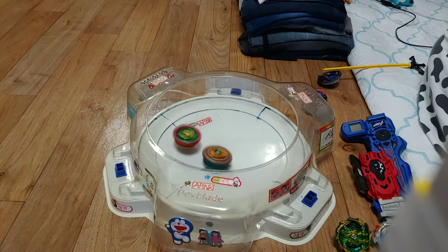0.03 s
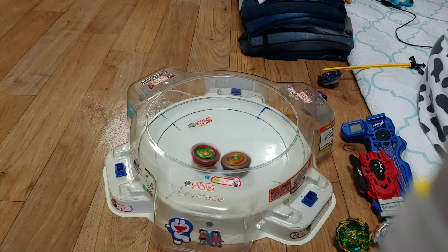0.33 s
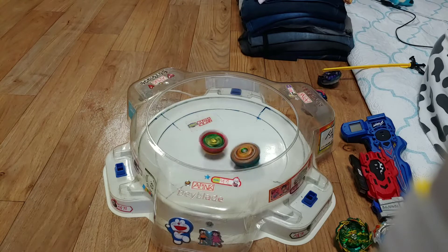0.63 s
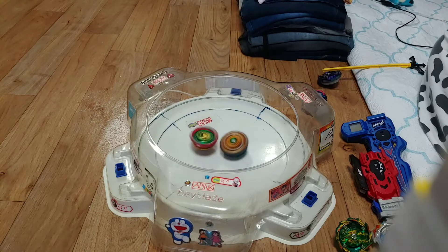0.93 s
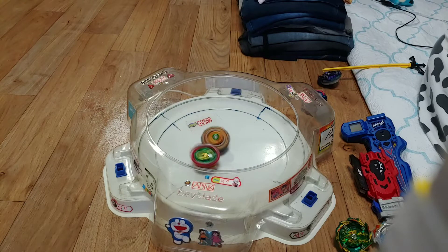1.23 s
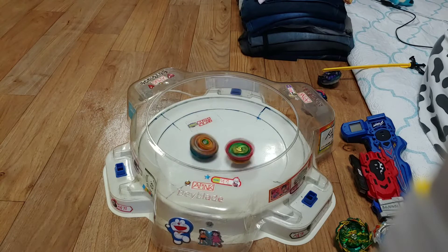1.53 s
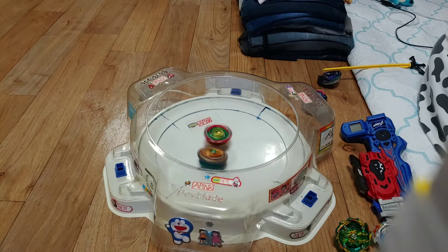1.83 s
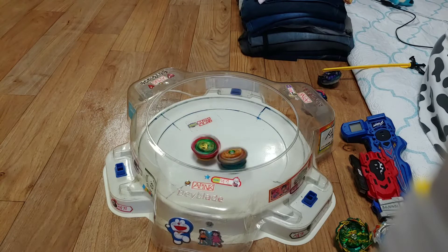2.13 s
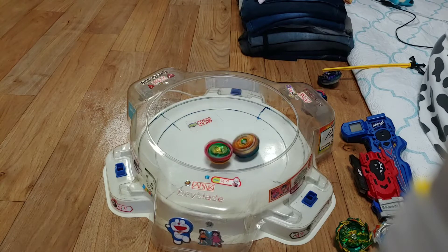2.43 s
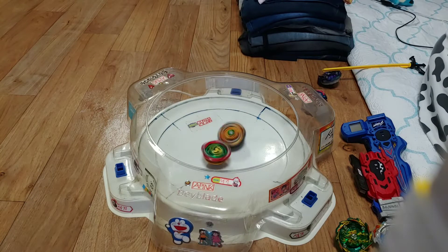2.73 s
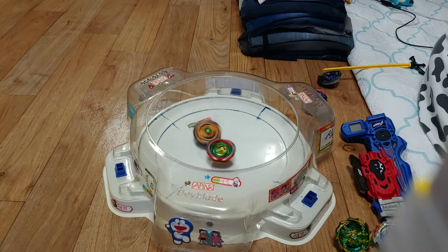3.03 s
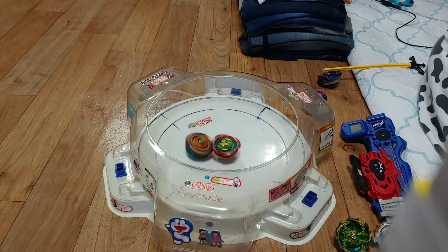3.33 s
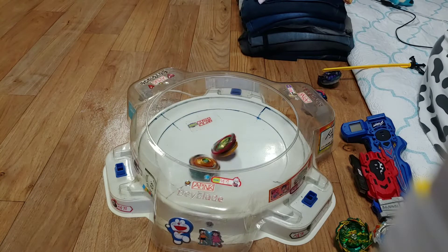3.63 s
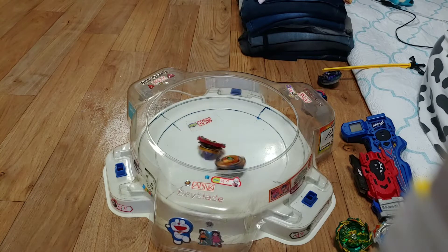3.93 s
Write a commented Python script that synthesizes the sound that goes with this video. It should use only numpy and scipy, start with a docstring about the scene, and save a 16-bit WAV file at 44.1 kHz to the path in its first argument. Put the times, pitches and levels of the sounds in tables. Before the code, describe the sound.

Toy tops spin and grind around a hollow plastic dish, clashing again and again.

```python
"""Spinning tops in a plastic arena

Two tops circle and slow down in a covered dish on a wooden floor. Friction at their tips
drives the resonances of the thin dish, which booms as they lurch and rattles its cover.
The rims clash and chatter, the metal discs whir, and a small room reverberates."""
import sys
import numpy as np
from scipy import signal
from scipy.fft import rfft, irfft
from scipy.io import wavfile

SR = 44100
rng = np.random.default_rng(int(sys.argv[2]) if len(sys.argv) > 2 else 0)


def bounce(signal):
    """Save signal as a 16-bit WAV file at the path given by the first command-line argument."""
    frames = np.transpose(np.atleast_2d(signal))
    limited = np.clip(frames, -1, 1)
    pcm = np.round(limited * 32767).astype(np.int16)
    wavfile.write(sys.argv[1], SR, pcm)


N = 176400


def undb(db):
    """Amplitude ratio of a level in decibels."""
    return 10 ** (np.asarray(db) / 20)


def unit(x):
    """Normalisation to unit rms."""
    return x / np.sqrt(np.mean(x ** 2))


def envelope(t, levels):
    """Amplitude envelope, linear in decibels between (time, level) points."""
    return undb(np.interp(t, *np.array(levels).T))


def gate(t, start, length, edge_s):
    """Trapezoidal window: on for a length of time, with short ramps."""
    return np.clip(np.minimum(t - start, start + length + edge_s - t) / edge_s + .5, 0, 1)


def minimum_phase(gain):
    """Folding the cepstrum gives the earliest causal response with these gains."""
    cepstrum = irfft(np.log(gain))
    cepstrum[1:len(cepstrum) // 2] *= 2
    cepstrum[len(cepstrum) // 2 + 1:] = 0
    return np.exp(rfft(cepstrum))


def response(colour, modes=(), size=8192):
    """Impulse response of unit energy: resonances on a broad spectral envelope."""
    f = np.arange(size // 2 + 1) * SR / size + 1
    hz, db = np.array(colour).T
    gain = undb(np.interp(np.log(f), np.log(hz), db))
    for centre, width, lift in modes:
        peak = 1 / (1 + (2 * (f - centre) / width) ** 2) ** 2
        gain *= np.sqrt(1 + (undb(lift) ** 2 - 1) * peak)
    h = irfft(minimum_phase(gain))
    return h / np.linalg.norm(h)


def through(x, h):
    """Convolution with an impulse response."""
    return signal.fftconvolve(x, h)[:len(x)]


def reverberate(x, t60_s, tail_db, above_hz):
    """Diffuse reflections add an exponentially decaying tail at about the same total power."""
    t = np.arange(16384) / SR
    tail = rng.standard_normal(len(t)) * np.exp(-np.log(1000) * t / t60_s)
    tail = signal.sosfilt(signal.butter(2, above_hz, "high", fs=SR, output="sos"), tail)
    h = tail * undb(tail_db) / np.linalg.norm(tail)
    h[0] += 1  # direct sound
    spectrum = rfft(h, 2 * len(h))
    h = irfft(spectrum * minimum_phase(abs(spectrum) ** -.45))  # partly evens out the spectrum
    return through(x, h / np.linalg.norm(h))


def under_cover(x):
    """Cavity reverberation: short, dense reflections between dish and cover."""
    return reverberate(x, t60_s=.13, tail_db=3, above_hz=800)


SPIN_HZ, SPIN_LOSS_HZ_PER_S = (72.7, 51.5), 6  # initial rotation rates and their decline
SLIPS_PER_S, SLIP_SPREAD_DB, WOBBLE_DEPTH = 6000, 3, .25


def friction(t):
    """Stick-slip friction: random impulses from both tips, modulated once a turn by wobble."""
    force = np.zeros(N)
    for hz in SPIN_HZ:
        turns = np.cumsum(hz - SPIN_LOSS_HZ_PER_S * t) / SR
        slips = (rng.random(N) < SLIPS_PER_S / SR) * rng.choice([-1, 1], N)
        strength = undb(SLIP_SPREAD_DB * np.minimum(rng.exponential(size=N), 4))
        wobble = 1 + WOBBLE_DEPTH * np.sin(2 * np.pi * (turns + rng.random()))
        force += slips * strength * wobble
    return unit(force)


# spectrum of the whir (frequency [Hz], gain [dB])
WHIR_COLOUR = [(500, -6.5), (3500, -23.5), (4400, -8.5), (5600, -8), (6150, -2.5), (6500, -0.5), (6850, -9),
               (7500, -18), (10500, -16.5), (12000, -26), (14300, -25), (15500, -33)]
# resonances of the discs (frequency [Hz], bandwidth [Hz], lift [dB])
DISC_MODES = [(6650, 85, 6), (10400, 350, 1), (14200, 250, 5)]
def whir(t, start_db=-52, fall_db_per_s=.53):
    """Forced vibration: the metal discs sing in the treble, fading as they slow."""
    return through(friction(t), response(WHIR_COLOUR, DISC_MODES)) * undb(start_db - fall_db_per_s * t)


# spectrum of the rumble (frequency [Hz], gain [dB])
RUMBLE_COLOUR = [(20, -7), (45, 7), (75, 4), (120, -12), (200, -7.5), (400, -12), (1500, -60)]
def rumble(t, start_db=-38, fall_db_per_s=1.8):
    """Structure-borne noise: the rolling tops shake the dish at low frequencies."""
    return through(friction(t), response(RUMBLE_COLOUR)) * undb(start_db - fall_db_per_s * t)


# resonances of the dish and cover (frequency [Hz], bandwidth [Hz], lift [dB])
ARENA_MODES = [(322, 31, 9.5), (387.3, 28, 9), (467, 22, -2), (490.6, 52.4, 8.5), (604, 62, 7),
               (795, 63, 6.5), (915, 61, 9), (983, 45, 8), (1067, 43, 6.5), (1139, 137, 7.5),
               (1547, 51, 1.5), (1860, 13, -2), (1920, 39, 4), (2220, 84, 4.5), (2870, 79, 2),
               (3200, 120, 2.5)]
def circling(force, colour, t, step_s=.22, detune=.014, spread_db=2.2):
    """Modal response depends on the driving point: each place passed rings a little differently."""
    out = np.zeros(N)
    for passing in np.arange(0, t[-1] + step_s / 2, step_s):
        modes = np.array(ARENA_MODES, float)
        pitch_scatter, lift_scatter = rng.standard_normal((len(modes), 2)).T
        modes[:, 0] *= 1 + detune * pitch_scatter
        modes[:, 2] += spread_db * lift_scatter
        near = np.flatnonzero(abs(t - passing) < step_s)
        crossfade = (1 - abs(t[near] - passing) / step_s) ** (2 / 3)
        ring = signal.fftconvolve(force[near] * crossfade, response(colour, modes))[:N - near[0]]
        out[near[0]:near[0] + len(ring)] += under_cover(ring)
    return out


# strength of the rolling (time [s], level [dB])
ROLL_LEVELS = [(0, -75), (.7, -38.5), (1.1, -59), (1.8, -48), (2.35, -47.5), (2.45, -40), (2.65, -43.5),
               (2.93, -40), (3.25, -64), (4, -56)]
# spectrum of its drone (frequency [Hz], gain [dB])
DRONE_COLOUR = [(150, -5), (300, -9), (450, -11), (700, -3.5), (950, -8.5), (1200, -12), (1600, -8),
                (2500, -18.5), (6000, -28), (15500, -67)]
def rolling(t):
    """Rolling contact excites the modes of the dish into a hollow drone."""
    return circling(friction(t) * envelope(t, ROLL_LEVELS), DRONE_COLOUR, t)


# bursts of rattling (start [s], duration [s], level [dB])
RATTLE_BURSTS = [(0.094, 0.056, -42), (0.263, .088, -39.5), (0.497, 0.14, -45.5), (.655, 0.11, -58),
                 (0.83, 0.17, -41), (1.047, 0.025, -44), (1.123, .045, -45.5)]
# spectrum of the cover (frequency [Hz], gain [dB])
COVER_COLOUR = [(1200, -23), (2000, -7), (2450, 5), (3400, 2), (3950, -4), (4500, -23), (9000, -40)]
# its resonances (frequency [Hz], bandwidth [Hz], lift [dB])
COVER_RESONANCES = [(2240, 71, 17), (2950, 50, 21), (3240, 110, 12)]
def rattle(t, clicks_per_s=600):
    """Intermittent contact: the thin cover buzzes against the dish in dense, bright clicks."""
    clicks = unit((rng.random(N) < clicks_per_s / SR) * rng.choice([-1, 1], N))
    level = sum(gate(t, start, length, edge_s=.003) * undb(db) for start, length, db in RATTLE_BURSTS)
    return through(clicks * level, response(COVER_COLOUR, COVER_RESONANCES))


# square blows on a top (time [s], level [dB])
SHELL_BLOWS = [(1.928, -46), (3.734, -33)]
# modes of its shell (frequency [Hz], gain [dB], 60 dB decay time [s])
SHELL_PARTIALS = [(2223, -9, .13), (2790, -7, 0.13), (2860, -23, .11)]
def pings(t):
    """Free vibration: a struck shell rings as a sum of damped sinusoids."""
    force, age = np.zeros(N), t[:SR // 4]
    ring = sum(undb(db) * np.sin(2 * np.pi * hz * age) * np.exp(-np.log(1000) * age / t60)
               for hz, db, t60 in SHELL_PARTIALS)
    for start, db in SHELL_BLOWS:
        force[int(start * SR)] = undb(db)
    return through(force, ring)


# lurches of a top (centre time [s], duration [s], level [dB], pitch [Hz])
LURCHES = [(0.047, 0.05, -33, 100), (0.209, 0.027, -17, 126), (0.248, 0.024, -21, 118),
           (0.308, 0.076, -24.5, 95), (0.344, 0.034, -23.5, 111), (0.559, 0.039, -23.5, 98),
           (0.616, 0.094, -20, 98), (0.874, 0.025, -24, 78), (0.929, 0.032, -20, 89),
           (0.993, 0.04, -19, 99), (1.075, 0.02, -18.5, 115), (1.106, 0.036, -20, 166),
           (1.163, 0.05, -19.5, 105), (1.244, 0.035, -17.5, 110), (1.288, 0.022, -13, 117),
           (1.355, 0.069, -35, 99), (1.481, 0.065, -16.5, 125.3), (1.565, 0.12, -27, 78),
           (1.613, 0.078, -27, 135), (1.685, 0.069, -25.5, 88), (1.842, 0.031, -22.5, 79),
           (1.884, 0.031, -38, 74.5), (2.264, 0.032, -26, 71), (2.38, 0.032, -30.5, 78),
           (2.439, 0.069, -29.5, 83), (2.637, 0.029, -25.5, 68), (2.762, 0.055, -21.5, 72),
           (2.946, 0.071, -18, 100), (3.005, 0.021, -21, 82.4), (3.038, 0.039, -22, 92),
           (3.081, 0.027, -23, 87.5), (3.114, 0.047, -28, 62.6), (3.53, 0.047, -30, 78),
           (3.831, 0.046, -32, 97), (3.968, 0.054, -30.5, 85)]
def booms(gain_db=-.56):
    """Plate flexure: each lurch bends the floor of the dish, radiating a swell of low noise."""
    out = np.zeros(N)
    offsets = np.arange(-4096, 4096)
    for centre, length, db, hz in LURCHES:
        band = signal.butter(2, [.46 * hz, 1.306 * hz], "band", fs=SR, output="sos")
        swell = np.exp(-(2 * offsets / SR / length) ** 2)
        boom = signal.sosfilt(band, rng.standard_normal(len(offsets))) * swell
        boom *= undb(db + gain_db) * np.linalg.norm(swell) / np.linalg.norm(boom)
        at = int(centre * SR) + offsets
        inside = (at >= 0) & (at < N)
        out[at[inside]] += boom[inside]
    return out


# strength of the grinding (time [s], level [dB])
GRIND_LEVELS = [(0, -28), (.3, -30.5), (.395, -32.5), (.5, -27.5), (.74, -31.5), (.8, -42), (.94, -30),
                (1.03, -33.5), (1.2, -35.5), (1.5, -39), (1.87, -41), (2.2, -41), (2.68, -47.5),
                (2.95, -41), (3.2, -42.5), (3.42, -39.5), (3.65, -41.5), (4, -41)]
# skids of a tip (start [s], duration [s], level [dB], treble lift [dB])
TIP_SKIDS = [(0.197, 0.034, -43.5, 14.5), (0.258, 0.047, -32, -4), (0.335, 0.028, -33.5, -4),
             (0.656, 0.095, -31.5, 3), (0.78, 0.023, -33, 2.5), (0.834, 0.039, -32, 4),
             (0.884, 0.11, -31.5, 6), (1.051, 0.045, -34.5, 4.5), (1.123, 0.045, -37.5, 7),
             (1.318, 0.014, -28.5, -11), (1.415, 0.025, -34.5, 3.5), (1.515, 0.066, -39, 3),
             (1.567, 0.027, -33, 1.5), (1.631, 0.031, -37, -2.5), (1.728, 0.034, -32, 1.5),
             (1.784, 0.019, -40, 5), (2.025, 0.013, -32, -3), (2.047, 0.028, -38, 7),
             (2.093, 0.017, -38.5, 0), (2.179, 0.016, -37, -1), (2.281, 0.041, -32, 2),
             (2.402, 0.0444, -31.5, 1), (2.481, 0.026, -35, 4.5), (2.556, 0.049, -34.5, 3.5),
             (2.737, 0.012, -36.5, 0), (2.897, 0.018, -37, 6), (2.968, 0.018, -44, -2),
             (3.051, 0.038, -36.5, -1), (3.734, 0.027, -38.5, 5), (3.886, 0.033, -39.5, 2),
             (3.961, 0.03, -37.5, 1)]
# spectrum of the scraped dish (frequency [Hz], gain [dB])
DISH_COLOUR = [(30, -11.5), (70, 18.5), (150, 0), (260, 7.5), (450, 4.5), (700, -3), (1250, -8),
               (1550, -1.5), (2150, -5.5), (2600, -10.5), (3400, -10), (3900, -13), (4400, -24.5),
               (7000, -25.5), (10500, -33.5), (12000, -36.5), (15500, -36)]
def grinding(t, skid_gain_db=1.5, crossover_hz=1390):
    """Sliding friction drives the dish; steady grinding and brief skids add in power."""
    low_power = high_power = envelope(t, GRIND_LEVELS) ** 2
    for start, length, db, treble_db in TIP_SKIDS:
        skid_power = gate(t, start, length, edge_s=.002) * undb(db + skid_gain_db) ** 2
        low_power = low_power + skid_power
        high_power = high_power + skid_power * undb(treble_db) ** 2
    slips = friction(t)
    low = signal.sosfilt(signal.butter(3, crossover_hz, "low", fs=SR, output="sos"), slips)
    high = signal.sosfilt(signal.butter(3, crossover_hz, "high", fs=SR, output="sos"), slips)
    return circling(low * np.sqrt(low_power) + high * np.sqrt(high_power), DISH_COLOUR, t)


def crack(force, above_hz):
    """Rapid reflections spread each impulse into a crack; a unit impulse has unit power over 48 ms."""
    return reverberate(force * np.sqrt(.048 * SR), t60_s=.022, tail_db=9, above_hz=above_hz)


# landings of a hopping tip (time [s], level [dB])
LANDINGS = [(1.247, -45), (1.361, -37), (1.381, -40), (1.706, -40), (1.901, -44.5), (2.014, -39.5),
            (2.399, -40.5), (2.729, -39.5), (3.819, -40), (3.838, -43), (3.909, -54), (3.961, -44.5)]
# spectrum of a landing (frequency [Hz], gain [dB])
LANDING_COLOUR = [(100, -16), (300, 7), (600, 7), (2000, -.5), (3400, -6.5), (4400, -19.5), (7000, -21),
                  (15500, -36)]
# resonances of the dish damped by a blow (frequency [Hz], bandwidth [Hz], lift [dB])
STRUCK_MODES = [(315, 42, 5.5), (1026, 110, 3), (2000, 89, 5)]
def taps(t, hops_per_s=22, hop_db=-13.5, spread_db=5):
    """Impulsive excitation: a hopping tip taps the dish, amid stray ticks that follow the grinding."""
    hops = rng.random(N) < hops_per_s / SR
    force = hops * envelope(t, GRIND_LEVELS) * undb(hop_db + spread_db * rng.uniform(-1.05, 1, N))
    for start, db in LANDINGS:
        force[int(start * SR)] += undb(db)
    return through(crack(force, above_hz=430), response(LANDING_COLOUR, STRUCK_MODES))


# collisions (time [s], rim level [dB], dish level [dB], chatter time constant [s])
COLLISIONS = [(0.06, -45.5, -34, 0.0064), (.078, -42, -30, 0.026), (0.411, -45, -31, 0.0084),
              (0.421, -44.5, -32.5, 0.038), (0.937, -54, -49, 0.026), (.966, -49, -35.5, 0.0022),
              (0.983, -50.5, -33.5, 0.034), (1.244, -54, -33.5, 0.022), (1.281, -53, -33.5, 0.048),
              (1.928, -46.5, -29, 0.0039), (1.943, -50.5, -28.5, 0.028), (2.268, -47.5, -37, 0.0044),
              (2.56, -53, -37.5, 0.0066), (2.585, -52.5, -44, 0.026), (2.96, -57.5, -34.5, 0.031),
              (3.049, -53, -39.5, 0.0046), (3.435, -57.5, -38.5, 0.027), (3.457, -53, -40, 0.041),
              (3.733, -56, -34.5, 0.017), (3.741, -56, -40, 0.0093), (3.823, -56, -41, 0.0045)]
# spectrum of the rims (frequency [Hz], gain [dB])
RIM_COLOUR = [(200, -63), (1500, -16.5), (3200, 3.5), (4600, -7.5), (6500, 4), (7600, -5), (10500, -2.5),
              (12200, -11), (15500, -26)]
# spectrum of the knock in the dish (frequency [Hz], gain [dB])
KNOCK_COLOUR = [(60, -16.5), (200, 16), (310, 13.5), (450, 5), (700, -2.5), (1500, -8.5), (2400, -10.5),
                (2900, -3.5), (3500, -16), (4300, -22), (7000, -49.5), (15500, -29.5)]
def clashes(chatter_per_s=480, rim_gain_db=4.5, knock_gain_db=3):
    """Impact and chatter of the rim teeth excite two bodies: the rims ring and the dish knocks."""
    on_rims, on_dish = np.zeros((2, N))
    age = np.arange(SR // 10) / SR
    for start, rim_db, knock_db, chatter_s in COLLISIONS:
        contacts = rng.random(len(age)) < chatter_per_s / SR
        hits = .4 * contacts * rng.standard_normal(len(age)) * np.exp(-age / chatter_s)
        hits[0] = 1  # the first impact
        hits /= np.linalg.norm(hits)
        i = int(start * SR)
        on_rims[i:i + len(age)] += undb(rim_db + rim_gain_db) * hits
        on_dish[i:i + len(age)] += undb(knock_db + knock_gain_db) * hits
    rims = through(crack(on_rims, above_hz=400), response(RIM_COLOUR))
    knocks = through(crack(on_dish, above_hz=400), response(KNOCK_COLOUR, STRUCK_MODES))
    return reverberate(rims, t60_s=.23, tail_db=4, above_hz=600), knocks


def scene():
    """Superposition: dish and tops sound together in the reverberation of a small room."""
    t = np.arange(N) / SR
    rims, knocks = clashes()
    dish = rumble(t) + rolling(t) + booms() + grinding(t) + under_cover(rattle(t) + taps(t) + knocks)
    tops = whir(t) + pings(t) + rims
    return reverberate(dish + tops, t60_s=.13, tail_db=-16, above_hz=270)[None]


def record(dry, cutoff_hz=15600):
    """Band limiting: a steep low-pass filter removes the highest treble."""
    return signal.sosfilt(signal.ellip(10, .2, 80, cutoff_hz, fs=SR, output="sos"), dry)


dry = scene()
out = record(dry)
bounce(out)
```